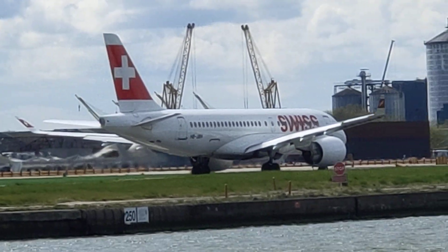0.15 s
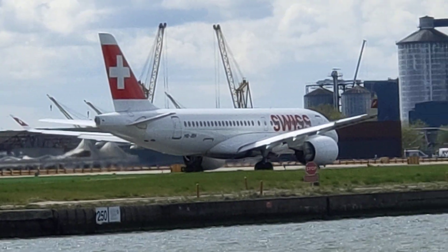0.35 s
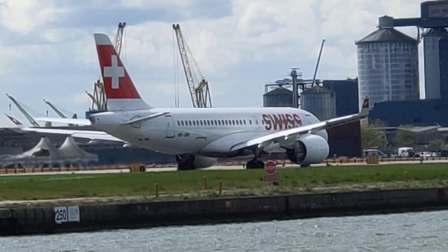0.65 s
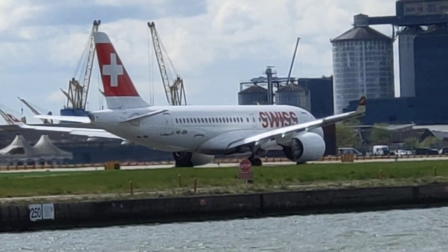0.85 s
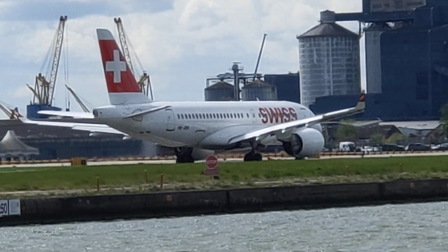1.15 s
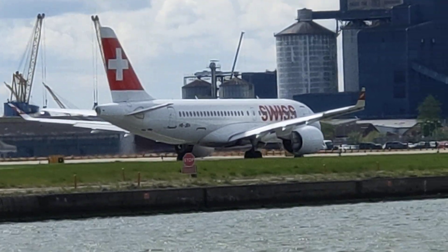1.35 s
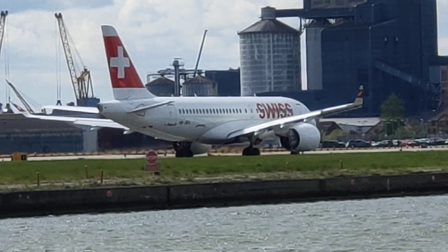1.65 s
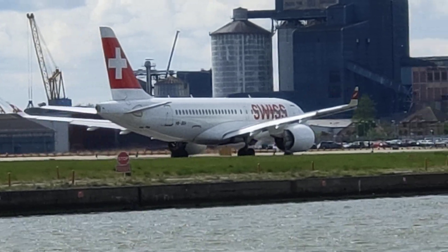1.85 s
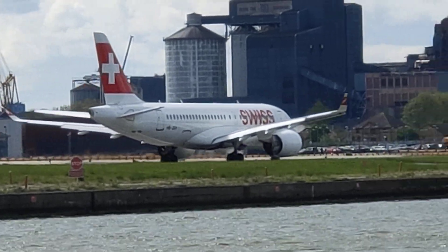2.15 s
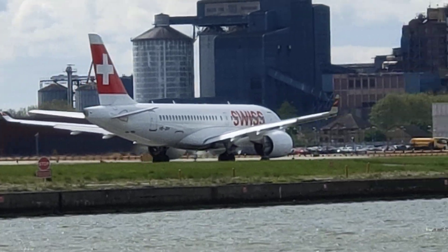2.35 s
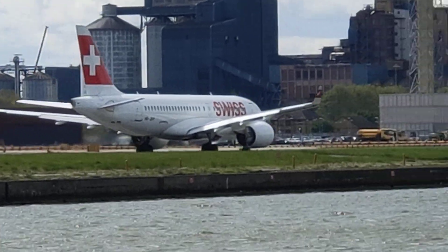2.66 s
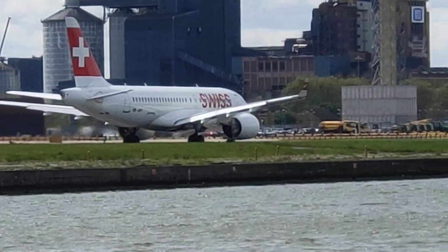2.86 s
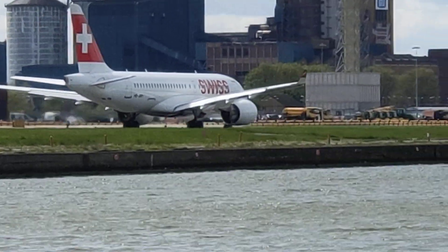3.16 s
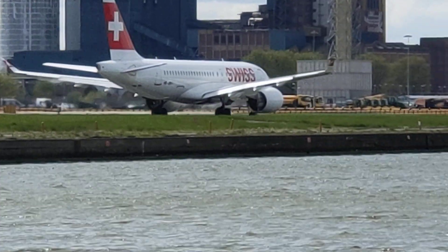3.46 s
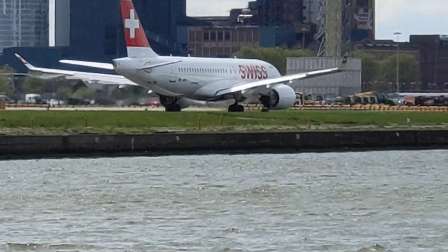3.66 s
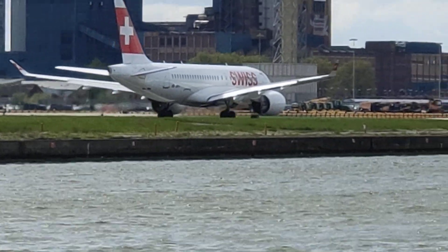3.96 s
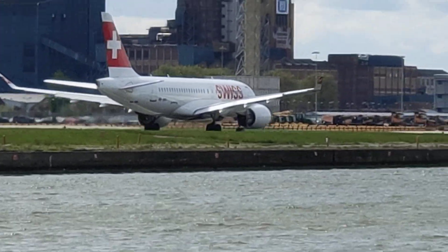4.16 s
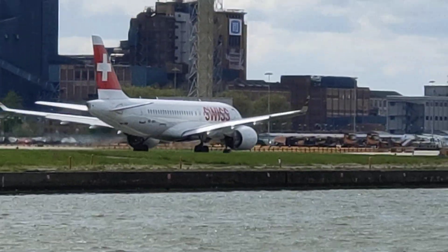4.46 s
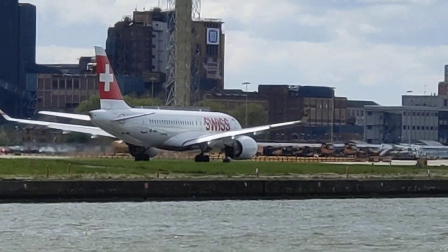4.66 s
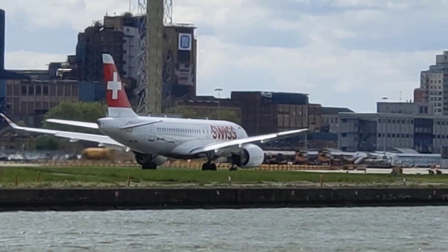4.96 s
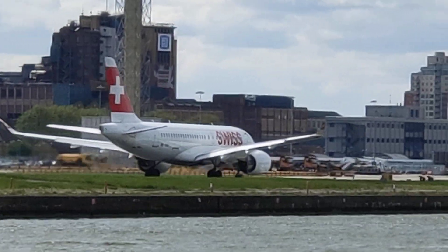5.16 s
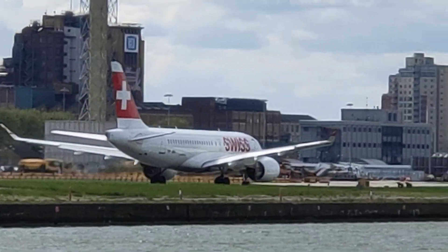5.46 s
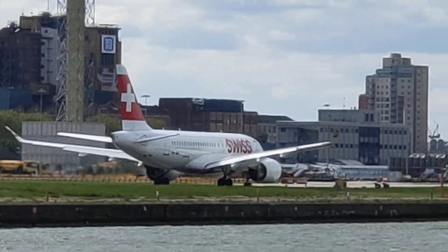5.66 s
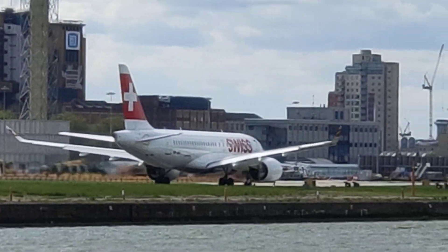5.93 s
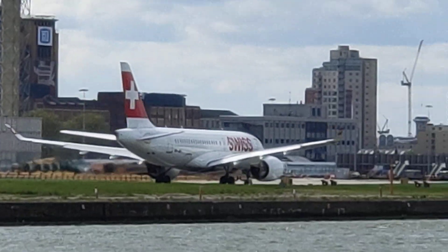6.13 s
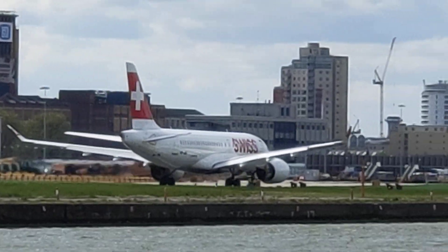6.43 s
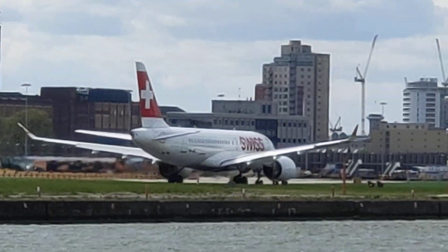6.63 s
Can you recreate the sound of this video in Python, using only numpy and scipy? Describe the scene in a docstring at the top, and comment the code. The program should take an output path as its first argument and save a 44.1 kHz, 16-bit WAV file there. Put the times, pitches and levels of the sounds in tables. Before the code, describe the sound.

A distant airliner's low engine rumble, hiss and thin whine swell and fade while gusty wind buffets the microphone.

```python
"""Airliner across a windy dock

A twin-engined airliner rolls along a runway across a dock, turning its tail to the listener.
Its churning exhaust rumbles and roars, its fans whine and hiss, and moving air makes the sound
swell and fade. Gusts thump the microphone's two openings, hardest around five seconds.
A very faint hiss and tiny ticks lie underneath."""
import sys
import numpy as np
from scipy import signal
from scipy.fft import rfft, irfft, next_fast_len
from scipy.io import wavfile
from scipy.ndimage import uniform_filter1d

SR = 44100
rng = np.random.default_rng(int(sys.argv[2]) if len(sys.argv) > 2 else 0)


def file_out(sig):
    """Save sig as 16-bit WAV at sys.argv[1]."""
    # one column per channel
    cols = np.atleast_2d(sig).T
    # limit, then scale
    lim = np.clip(cols, -1, 1)
    pcm = np.round(lim * 32767).astype(np.int16)
    wavfile.write(sys.argv[1], SR, pcm)


N = 299439
SECONDS = np.arange(N) / SR
FRAME, HOP = 2048, 512  # noise is shaped in short frames: their length and spacing in samples
HZ = np.fft.rfftfreq(FRAME, 1 / SR)
FRAME_S = np.arange(N // HOP + 3) * HOP / SR

# How the engines face us. Each row: time in seconds, turn from 0 (side-on) to 1 (from behind).
TAIL_TURN = [(0, 0.54), (2.6, 0.012), (3.6, 1), (6.79, 1)]
# The exhaust's rumble. Each row: time in seconds, level in dB.
RUMBLE_LEVEL = [(0, -27), (0.3, -28.5), (1.05, -26.5), (1.75, -27.5), (2.7, -28.5), (2.92, -27.5),
                (3.2, -28), (3.7, -29.5), (4.15, -32), (4.65, -32), (5.5, -27.5), (6, -30), (6.79, -32.5)]
# The jet as the wind carries it. Each row: time in seconds, base levels of roar and hiss in dB.
JET_LEVELS = [(0, -38, -39), (0.42, -40, -39), (0.78, -36.5, -39), (1.12, -34, -35), (1.5, -34, -37),
              (1.83, -33.5, -38), (2.08, -29, -35), (2.33, -29.5, -35), (2.6, -32, -37.5),
              (3.05, -35.5, -41), (3.42, -38.5, -44), (3.68, -38.5, -47), (4.05, -41, -47),
              (4.55, -41.5, -46), (4.7, -38.5, -44), (4.87, -37, -43), (5.3, -40, -45), (5.8, -38.5, -43.5),
              (6.4, -39.5, -48), (6.79, -41, -48)]
# The tone colour of each jet noise. Each row: frequency in Hz, relative level in dB.
RUMBLE_SIDE = [(15, -32.5), (30, -24), (45, -17), (65, -7.5), (88, 0), (130, -2), (175, -3), (240, -8),
               (320, -13.5), (400, -20), (490, -24.5), (700, -27.5), (1500, -69.5)]
RUMBLE_BEHIND = [(15, -31.5), (30, -24), (45, -13.5), (65, -6), (88, 1), (130, -1.5), (175, -4),
                 (240, -10.5), (310, -15.5), (440, -19.5), (560, -20), (700, -25.5), (1500, -68)]
ROAR_SPECTRUM = [(250, -28.5), (420, -29), (520, -13), (620, -3), (780, -1), (900, -0.5), (1120, -0.5),
                 (1270, -3.5), (1420, -9), (1600, -7), (2000, -31), (3000, -71.5)]
RUSH_SIDE = [(1200, -41.5), (1600, -30), (1720, 1.5), (1850, 4), (2000, 4), (2200, 3.5), (2600, -33),
             (4000, -73.5)]
RUSH_BEHIND = [(1200, -42), (1590, -15.5), (1665, 2.5), (1760, 0), (1930, -2.5), (2100, -19), (2600, -28.5),
               (4000, -69.5)]
HISS_SIDE = [(700, -25), (1400, 0), (1900, -1), (2250, 2), (2500, 1), (2850, -4.5), (3400, -8), (3850, -6),
             (4150, -13.5), (4450, -13), (5050, -22), (5480, -37), (5700, -29.5), (6150, -67.5)]
HISS_BEHIND = [(700, -10), (1400, -3.5), (2000, 0.5), (2200, -1.5), (2420, 1.5), (2620, 0.5), (2870, -5.5),
               (3130, -3.5), (3280, -1), (3450, -6), (3650, -9), (3850, -8), (4080, -9), (4320, -12.5),
               (4700, -12), (5100, -15), (5700, -23.5), (6150, -42.5)]
# How often fan blades pass, which sets the whine's pitch. Each row: time in seconds, pitch in Hz.
BLADE_PITCH = [(0, 802), (0.7, 798), (2.85, 798), (3.1, 807), (3.4, 813), (3.9, 825), (4.3, 828),
               (5.1, 820), (5.55, 822), (5.9, 817), (6.4, 819), (6.79, 813)]
# The whine's lowest tone, coming and going on the wind. Each row: time in seconds, base level in dB.
BLADE_LEVEL = [(0, -50), (0.55, -45.5), (1.55, -44), (1.75, -35.5), (1.95, -46), (2.23, -25), (2.35, -37.5),
               (2.6, -47), (2.98, -41.5), (3.2, -48.5), (3.4, -35.5), (3.58, -48.5), (4.8, -49.5),
               (5.37, -40.5), (5.7, -57), (5.84, -42.5), (6.02, -38.5), (6.25, -60), (6.79, -46)]
# The whine's five tones, lowest first. Each row: dB added to the base level, further dB from behind,
# width in Hz, left minus right in dB.
HARMONICS = [(1, 0.5, 15, 2.5), (-10.5, 8.5, 18, 9), (-11.5, -4, 48, -6), (-19, 4, 38, -4.5),
             (-28, 1.5, 60, -3.5)]
# Moving air briefly focuses one band of sound.
# Each row: peak time in seconds, half length in seconds, centre in Hz, boost in dB.
AIR_SWELLS = [(1.07, 0.11, 1970, 4.5), (1.202, 0.4, 1150, 5.5), (1.73, 0.05, 876, 4),
              (1.781, 0.15, 1150, 5.5), (2.228, 0.055, 762, 7.5), (2.22, 0.12, 1700, 2),
              (2.35, 0.25, 2750, 2.5), (2.42, 0.03, 673, 4.5), (2.694, 0.072, 1130, 8),
              (3.35, 0.17, 3400, 3.5), (3.386, 0.17, 678, 9.5), (3.387, 0.078, 1680, 6.5),
              (3.92, 0.12, 1630, 2.5), (4.4, 0.33, 1880, 4.5), (4.892, 0.08, 1670, 4.5),
              (5.332, 0.093, 820, 3.5), (5.43, 0.063, 1670, 3), (5.7, 0.44, 1770, 6), (5.953, 0.25, 980, 5),
              (6.05, 0.36, 2550, 0.5)]
# How alike left and right sound. Each row: frequency in Hz, likeness from 0 to 1.
ALIKE_SIDE = [(100, 1), (250, .98), (470, .78), (680, .94), (1150, .92), (1550, .55), (1850, .82),
              (2350, .74), (3200, .78), (4400, .55), (5500, .2)]
ALIKE_BEHIND = [(100, 1), (250, .95), (470, .72), (700, .8), (1100, .58), (1450, .36), (1850, .68),
                (2250, .13), (2800, .2), (3250, .62), (3600, .25), (4000, .5), (4500, .15)]
# How far the left wave runs ahead of the right. Each row: frequency in Hz, lead in radians.
LEFT_LEAD = [(50, 0), (1180, -.1), (1400, 1.5), (1590, 1.8), (1720, -.1), (2070, -.1), (2330, 2.1),
             (2600, 5.3), (2930, 6.6), (4310, 6.5), (5200, 7.3)]
# Which side is louder. Each row: frequency in Hz, left minus right in dB.
LEAN_SIDE = [(100, -1), (700, 0), (1200, -1.5), (1450, -5.5), (1700, 5), (1950, -2), (2250, -9),
             (2500, -10), (2800, -5), (3300, 0), (3900, -4.5), (5500, 1)]
LEAN_BEHIND = [(100, -0.5), (550, 0), (1150, -2), (1600, -1.5), (1950, -5), (2400, 2), (2850, -5.5),
               (3250, -2.5), (3800, -2.5), (4400, -4.5), (5200, -16.5), (6000, -0.5)]
# The breeze at the microphone, with a lull midway. Each row: time in seconds, base level in dB.
BREEZE_LEVEL = [(0, -44.5), (1.5, -40), (3.1, -47), (3.5, -61.5), (4.4, -50), (4.7, -31.5), (5.25, -26),
                (5.7, -40), (6.2, -37), (6.79, -46)]
# Gusts. Each row: peak time in seconds, half length in seconds, left level in dB, right level in dB.
WIND_GUSTS = [(0.072, 0.033, -25, -35), (0.436, .02, -32, -33), (0.617, 0.043, -30.5, -29),
              (0.807, 0.049, -35, -25), (0.981, 0.023, -33, -25), (1.318, 0.016, -25.5, -32),
              (1.476, 0.064, -29, -24.5), (1.644, 0.067, -37, -28.5), (2.036, 0.037, -32, -33),
              (2.299, 0.034, -34, -26.5), (2.593, 0.027, -32, -28), (2.732, 0.02, -37, -32),
              (2.935, 0.019, -34, -26.5), (4.773, 0.048, -48, -23.5), (4.919, 0.065, -30, -18.5),
              (5.137, 0.026, -20, -35), (5.211, 0.063, -18.5, -28), (5.365, 0.085, -18, -31),
              (5.513, 0.084, -41, -24), (5.923, 0.064, -24, -29), (6.188, 0.071, -29.5, -43),
              (6.61, .018, -35, -37)]
# The hardest eddies (swirls of air). Each row: time in seconds, peak in dB, half width in seconds,
# side (1 left, -1 right), pressure (1 push, -1 suction).
HARD_EDDIES = [(0.091, -12, 0.0012, 1, -1), (0.1, -8.5, 0.0013, 1, -1), (1.331, -10, 0.0013, 1, -1),
               (1.429, -12, 0.0013, 1, 1), (1.64, -12.5, 0.0013, -1, -1), (4.779, -15, 0.0006, -1, -1),
               (4.878, -16, 0.00098, -1, -1), (4.922, -13.5, 0.00066, -1, -1), (4.936, -8, 0.00046, -1, -1),
               (4.944, -8, 0.00046, -1, -1), (5.069, -11, .0008, -1, -1), (5.116, -8, .0006, -1, -1),
               (5.134, -13, .0013, 1, 1), (5.15, -14, 0.00076, 1, 1), (5.171, -9, 0.00039, -1, -1),
               (5.201, -9, 0.00093, 1, -1), (5.218, -7.5, 0.0016, 1, 1), (5.265, -13, .0008, 1, 1),
               (5.311, -6.5, 0.0011, 1, -1), (5.332, -7, 0.0016, 1, -1), (5.354, -12, 0.00076, 1, 1),
               (5.389, -4.5, 0.001, 1, 1), (5.488, -10.5, 0.00052, -1, -1), (5.52, -14.5, 0.00057, -1, -1),
               (5.93, -17.5, 0.00066, 1, 1)]
# The tone colour of the wind, faint hiss and ticks. Each row: frequency in Hz, relative level in dB.
WIND_SPECTRUM = [(15, -33), (45, -17), (75, -3), (115, 1.5), (170, 0), (240, 2), (330, -4.5), (430, -9.5),
                 (600, -11), (900, -25.5), (1500, -30.5), (3000, -53.5), (6000, -86.5)]
FAINT_HISS_SPECTRUM = [(100, -20.5), (6000, 11), (7500, 9.5), (9500, 5), (11000, -5.5), (12500, -5.5),
                       (14000, -17.5)]
TICK_SPECTRUM = [(5000, -29), (7500, -9.5), (9200, 3.5), (10500, -9), (14000, -24.5)]
# The clearer ticks. Each row: time in seconds, level in dB before trim_db is added.
CLEAR_TICKS = [(0.8372, -69), (1.0397, -65), (1.1574, -65), (1.3161, -67), (1.8778, -69), (2.7718, -68),
               (2.9977, -64), (3.0771, -67), (3.7176, -67), (4.0354, -62), (5.7081, -65), (6.5177, -66)]


def jet():
    """Churning air from exhaust and fans; the ground's echo leaves a dip between rumble and roar."""
    roar_db, hiss_db = follow(JET_LEVELS, FRAME_S)
    rumble_db, = follow(RUMBLE_LEVEL, FRAME_S)
    behind, = follow(TAIL_TURN, FRAME_S)
    depth_db = np.interp(behind, (0, 1), (2, 3.5))  # the roar is deeper from behind
    tilt_db = -.5 * depth_db * np.tanh((HZ[:, None] - 880) / 130)
    rush_db = roar_db + np.interp(behind, (0, 1), (-7, -8.5))  # the fans' rush follows the roar
    rumble = band_power(turning(RUMBLE_SIDE, RUMBLE_BEHIND), rumble_db, 35, 330)
    roar = band_power(at_hz(ROAR_SPECTRUM) + tilt_db, roar_db, 560, 1350)
    rush = band_power(turning(RUSH_SIDE, RUSH_BEHIND), rush_db, 1645, 2240)
    hiss = band_power(turning(HISS_SIDE, HISS_BEHIND), hiss_db, 1865, 5400)
    focus = gain_of(focus_db(FRAME_S, HZ[:, None])) ** 2
    power = rumble + (roar + rush + hiss) * focus
    return stereo_noise(np.sqrt(power) * shimmer())


def fan_whine(steady=0.42, alike=0.61, fade_db=2, fade_hz=8, waver_radians=0.72):
    """Passing blades make tones: part stays clean, part is smeared into noise by churning air."""
    pitch_hz, = follow(BLADE_PITCH, SECONDS)
    lowest_db, = follow(BLADE_LEVEL, SECONDS)
    behind, = follow(TAIL_TURN, SECONDS)
    roar_db, _ = follow(JET_LEVELS, SECONDS)
    overtone_db = -44.5 + 0.93 * (roar_db - roar_db.mean())  # upper tones rise and fall with the roar
    cycles = np.cumsum(pitch_hz) / SR
    out = np.zeros((2, N))
    for multiple, (db, behind_db, width_hz, lean_db) in enumerate(HARMONICS, 1):
        clean = np.exp(1j * multiple * waver_radians * wander(4.3, channels=1).real)
        scatter = wander(width_hz, channels=3)  # left, right and shared
        smeared = np.sqrt(alike) * scatter[2] + np.sqrt(1 - alike) * scatter[:2]
        clean_share = steady ** (multiple / 2)  # higher tones are smeared more
        blend = np.sqrt(clean_share) * clean + np.sqrt(1 - clean_share) * smeared
        tone = blend * np.exp(2j * np.pi * multiple * cycles)
        tone[0] *= np.exp(1j * at_hz(LEFT_LEAD, multiple * pitch_hz)[:, 0])
        if multiple == 1:
            base_db = lowest_db
        else:
            base_db = overtone_db + focus_db(SECONDS, multiple * pitch_hz.mean())
        flutter_db = fade_db * wander(fade_hz, channels=1).real
        sides_db = np.array([[lean_db], [-lean_db]]) / 2
        level_db = base_db + flutter_db + db + behind_db * behind + sides_db
        out += np.sqrt(2) * tone.real * gain_of(level_db)
    return out


def turning(side_on, from_behind):
    """Blends two frequency tables as the aircraft turns its tail."""
    behind, = follow(TAIL_TURN, FRAME_S)
    return (1 - behind) * at_hz(side_on) + behind * at_hz(from_behind)


def focus_db(t, hz, half_octaves=0.25):
    """How much the moving air lifts the frequency hz at time t."""
    return sum(db * bell(t, s, half_s) * bell(np.log2((hz + 1) / centre_hz), 0, half_octaves)
               for s, half_s, centre_hz, db in AIR_SWELLS)


def shimmer(depth_db=0.79):
    """Restless air lifts and dims patches of the distant sound, less so in the bass."""
    patches = rng.standard_normal((len(HZ), len(FRAME_S)))
    patches = uniform_filter1d(patches, 22, axis=0)  # smooth across frequency
    patches = uniform_filter1d(patches, 9, axis=1)  # smooth across time
    spare_bass = np.minimum(HZ / 600, 1)[:, None]
    return gain_of(depth_db * patches / patches.std() * spare_bass)


def stereo_noise(strength):
    """Noise shaped frame by frame, reaching left and right with different timing and level."""
    white = rng.standard_normal((2, (len(FRAME_S) - 1) * HOP))
    direct, diffuse = signal.stft(white, nperseg=FRAME, noverlap=FRAME - HOP)[2]
    alike = np.clip(turning(ALIKE_SIDE, ALIKE_BEHIND), 0, .995)
    right = (alike * direct + np.sqrt(1 - alike ** 2) * diffuse) * np.exp(-1j * at_hz(LEFT_LEAD))
    lean = gain_of(turning(LEAN_SIDE, LEAN_BEHIND))
    pair = np.array([lean * direct, right]) * np.sqrt(2 / (1 + lean ** 2))
    return signal.istft(pair * strength, nperseg=FRAME, noverlap=FRAME - HOP)[1][:, :N]


def wind(lumpy_db=1.75, eddy_hz=45, brighten=0.24, bright_above_db=-19.5, tugs_per_s=70, tug_share=0.28):
    """Eddies tug at each microphone opening; stronger gusts hold smaller, brighter eddies."""
    wind_db = wind_strength()
    tugs = unit_level(1. * (rng.random((2, N)) < tugs_per_s / SR))
    pressure = np.sqrt(1 - tug_share) * rng.standard_normal((2, N)) - np.sqrt(tug_share) * tugs
    flow = coloured(WIND_SPECTRUM, pressure)
    bass = signal.sosfiltfilt(signal.butter(2, 330, fs=SR, output="sos"), flow)
    flutter = (flow - bass) * gain_of(brighten * (wind_db - bright_above_db))
    swirl = np.clip(np.sqrt(2) * wander(eddy_hz).real, -2, 2)
    lumps = unit_level(gain_of(lumpy_db * swirl))
    return (bass + flutter) * lumps * gain_of(wind_db)


def wind_strength(puff_db=4, puff_hz=6):
    """The wind's level on each side in dB: a breeze in random puffs, with gusts on top."""
    puffs = np.clip(np.sqrt(2) * wander(puff_hz).real, -2, 1.3)
    breeze_db = follow(BREEZE_LEVEL, SECONDS)[0] + puff_db * puffs
    gust_power = sum((gain_of([[left_db], [right_db]]) * bell(SECONDS, s, half_s)) ** 2
                     for s, half_s, left_db, right_db in WIND_GUSTS)
    return 10 * np.log10(gain_of(breeze_db) ** 2 + gust_power)


def wind_thumps():
    """The hardest eddies each hit one side: a sharp push or suction between two softer rebounds."""
    out = np.zeros((2, N))
    t = np.arange(-256, 256) / SR
    for s, db, half_s, side, pressure in HARD_EDDIES:
        push = (1 - (t / half_s) ** 2) * np.exp(-.5 * (t / half_s) ** 2)
        start = round(s * SR) - len(t) // 2
        out[int(side < 0), start:start + len(t)] += pressure * gain_of(db) * push
    return out


def faint_hiss(level_db=-77, flicker_db=3):
    """A very faint hiss under everything, flickering slightly."""
    flicker = np.clip(flicker_db * wander(25, channels=1).real, -4, 4)
    return coloured(FAINT_HISS_SPECTRUM, rng.standard_normal((2, N))) * gain_of(level_db + flicker)


def faint_ticks(half_s=.008, trim_db=-5, per_s=7, crackle_db=-75, spread_db=2):
    """Tiny, soft, very high ticks: a few clearer ones over a random crackle."""
    happens = rng.random(N) < per_s / SR
    strikes = happens * gain_of(crackle_db + spread_db * np.clip(rng.standard_normal(N), -2, 2))
    for s, db in CLEAR_TICKS:
        strikes[round(s * SR)] = gain_of(db + trim_db)
    loudness = signal.oaconvolve(strikes, signal.windows.hann(round(2 * half_s * SR)), "same")
    return loudness * coloured(TICK_SPECTRUM, rng.standard_normal((2, N)))


def gain_of(db):
    """Turns decibels into a number to multiply by."""
    return 10 ** (np.asarray(db) / 20)


def unit_level(x):
    """Scales each channel to an average power of 1."""
    return x / np.sqrt(np.mean(abs(x) ** 2, -1, keepdims=True))


def bell(x, centre, half_width):
    """A smooth rise and fall of height 1."""
    return np.exp(-((x - centre) / half_width) ** 2)


def follow(rows, t):
    """Looks up each column of a time table at times t."""
    s, *columns = np.transpose(rows)
    return [np.interp(t, s, column) for column in columns]


def at_hz(rows, hz=HZ):
    """Looks up a frequency table on a log scale and returns one column."""
    f, value = np.transpose(rows)
    return np.interp(np.log(hz + 1), np.log(f), value)[:, None]


def wander(rate_hz, channels=2):
    """A smooth random drift in complex numbers, changing at about the given rate."""
    f = np.fft.fftfreq(next_fast_len(N), 1 / SR)
    real, imag = rng.standard_normal((2, channels, len(f)))
    spectrum = (real + 1j * imag) / (1 + (f / rate_hz) ** 2)
    return unit_level(np.fft.ifft(spectrum)[:, :N])


def coloured(rows, sound):
    """Gives a sound the tone colour in a table, at an average power of 1."""
    size = next_fast_len(N)
    colour = gain_of(at_hz(rows, np.fft.rfftfreq(size, 1 / SR))[:, 0])
    return unit_level(irfft(rfft(sound, size) * colour, size)[:, :N])


def band_power(colour_db, level_db, lo_hz, hi_hz):
    """Power at each frequency in each frame, scaled so that lo_hz to hi_hz has the given level."""
    power = gain_of(colour_db) ** 2
    inside = ((HZ > lo_hz) & (HZ < hi_hz))[:, None]
    return power / (power * inside).mean(0) * gain_of(level_db) ** 2


def scene():
    """The aircraft far away, the wind close by."""
    return jet() + fan_whine() + wind() + wind_thumps() + faint_hiss() + faint_ticks()


def record(dry):
    """Cuts the highest treble, above 14100 Hz."""
    low_pass = signal.firwin(511, 14100, window=("kaiser", 9), fs=SR)
    return signal.oaconvolve(dry, low_pass[None], "same")


dry = scene()
out = record(dry)
file_out(out)
```